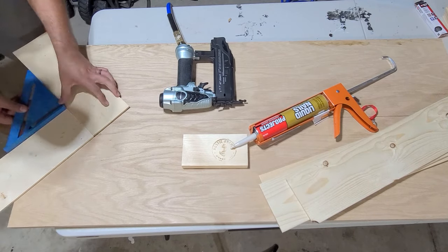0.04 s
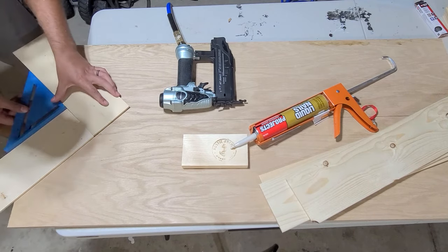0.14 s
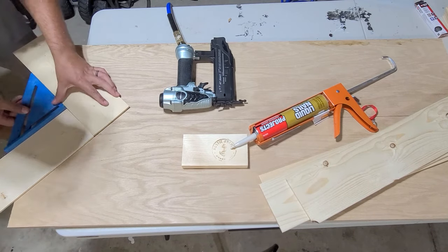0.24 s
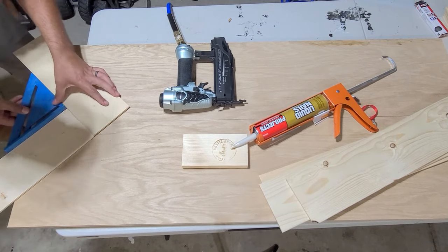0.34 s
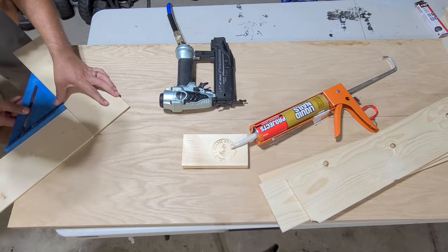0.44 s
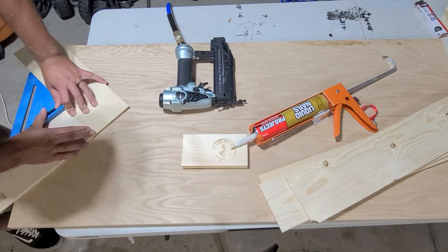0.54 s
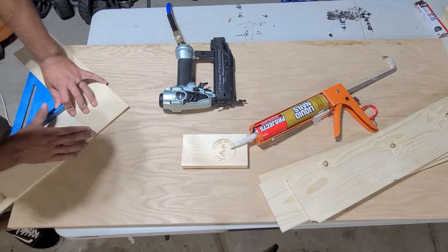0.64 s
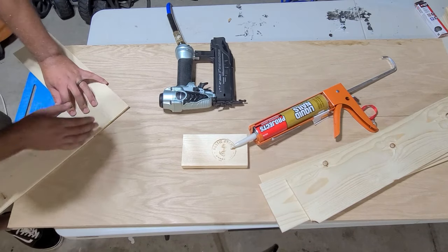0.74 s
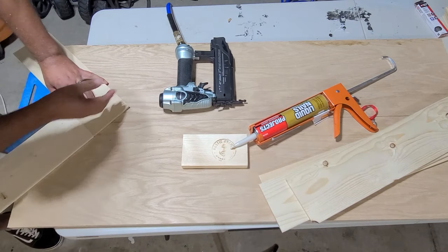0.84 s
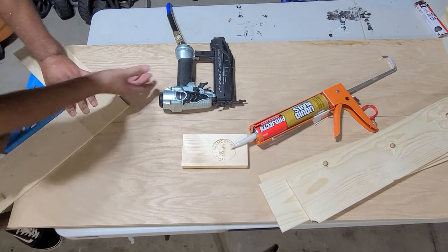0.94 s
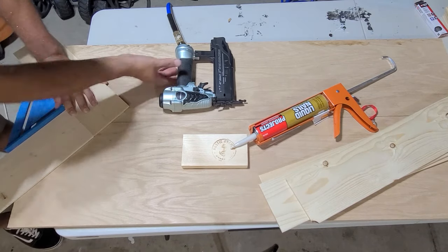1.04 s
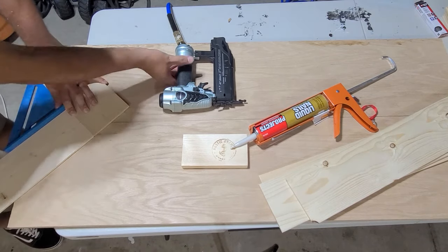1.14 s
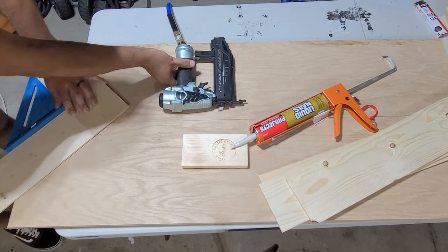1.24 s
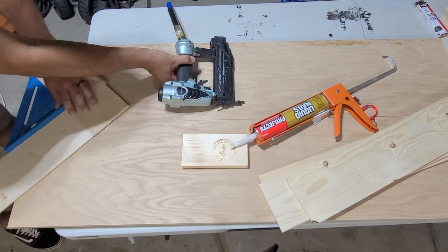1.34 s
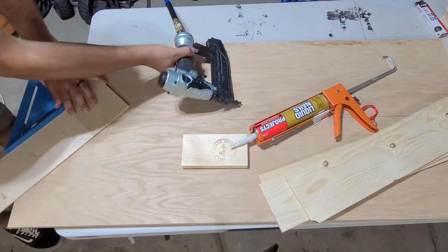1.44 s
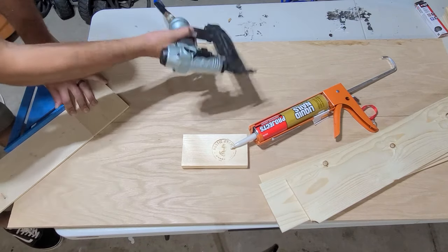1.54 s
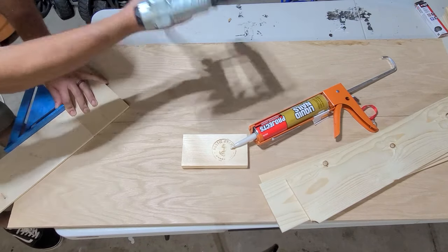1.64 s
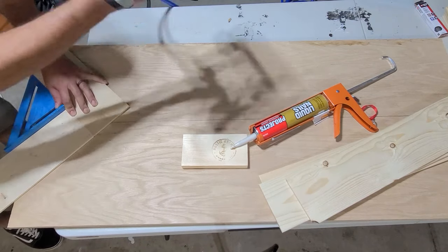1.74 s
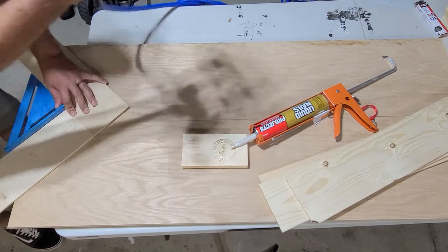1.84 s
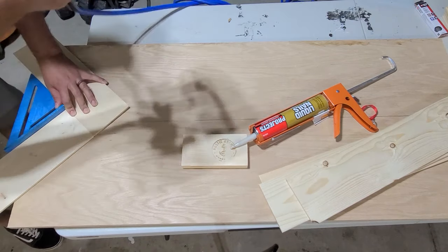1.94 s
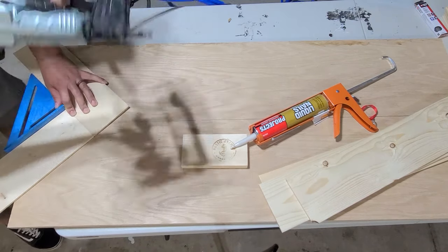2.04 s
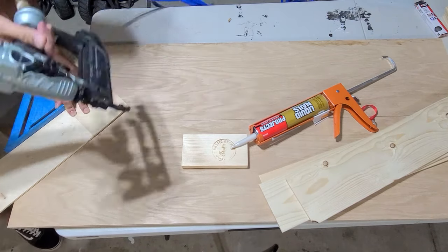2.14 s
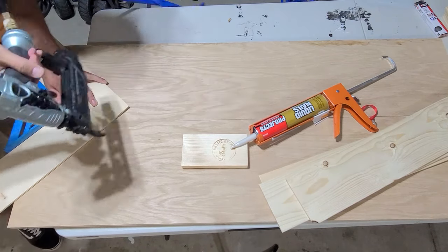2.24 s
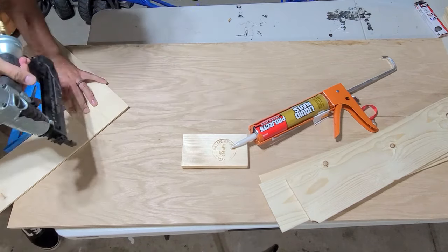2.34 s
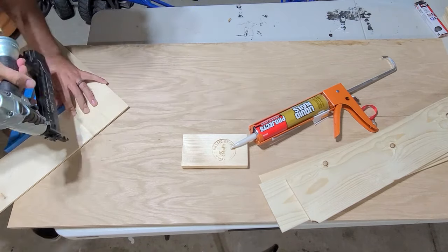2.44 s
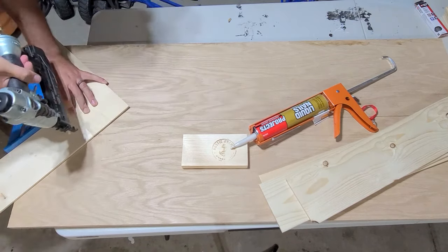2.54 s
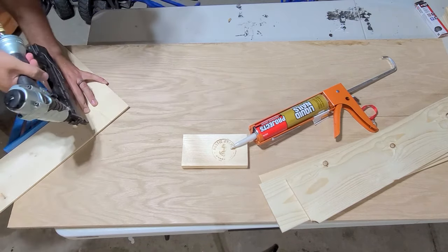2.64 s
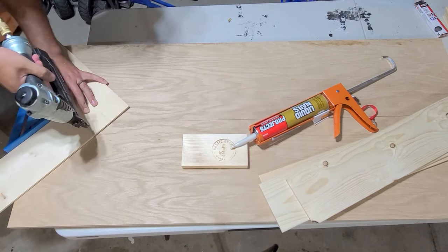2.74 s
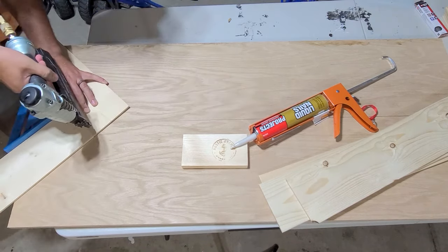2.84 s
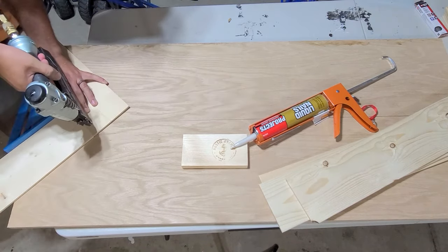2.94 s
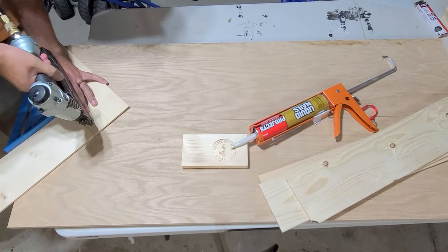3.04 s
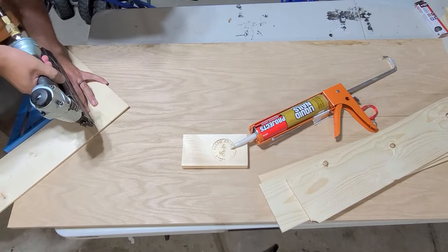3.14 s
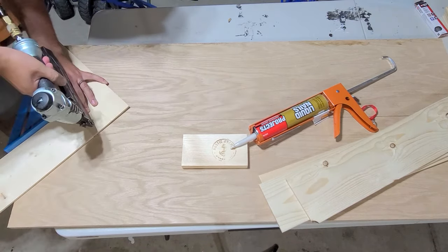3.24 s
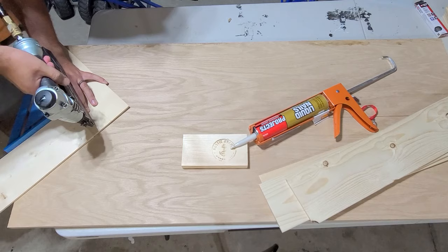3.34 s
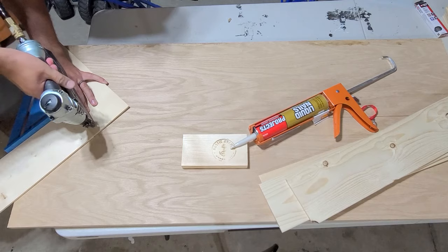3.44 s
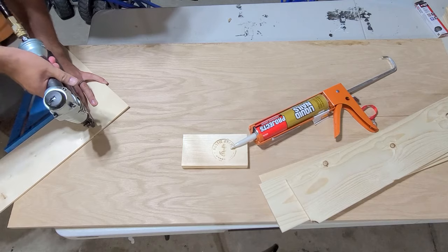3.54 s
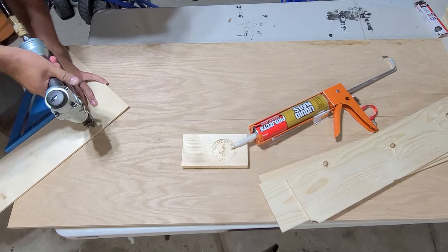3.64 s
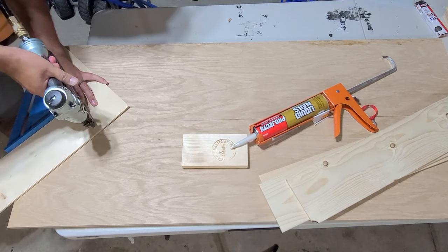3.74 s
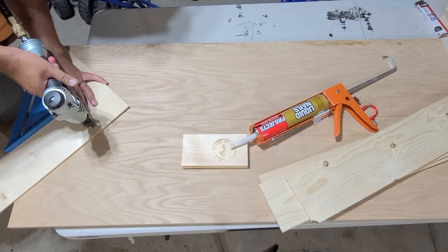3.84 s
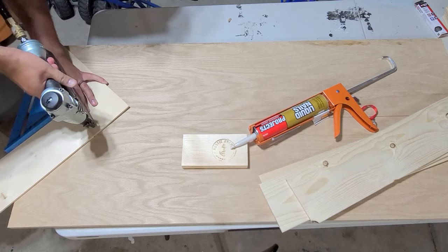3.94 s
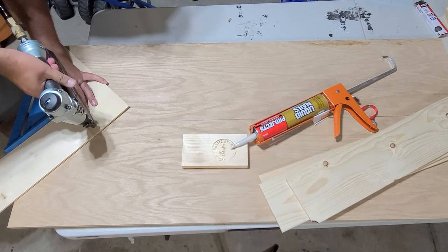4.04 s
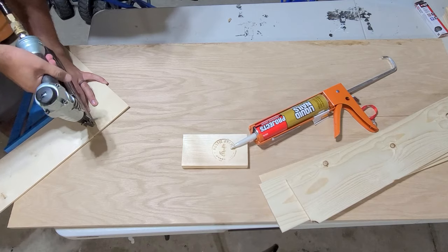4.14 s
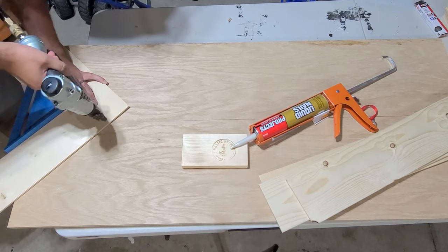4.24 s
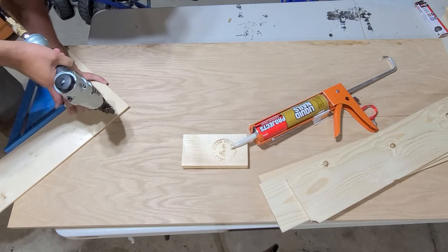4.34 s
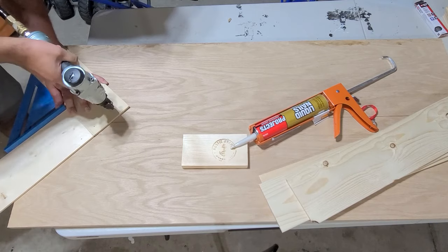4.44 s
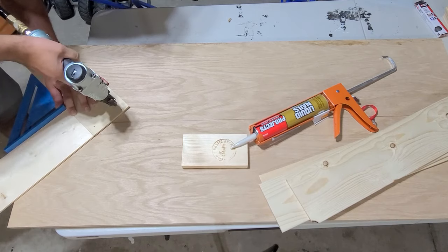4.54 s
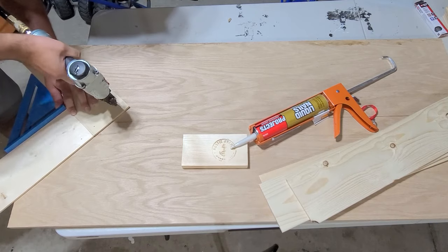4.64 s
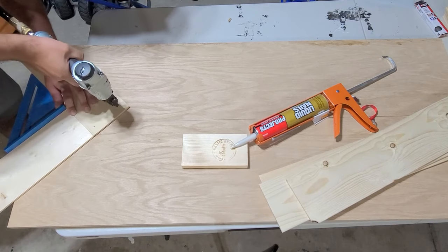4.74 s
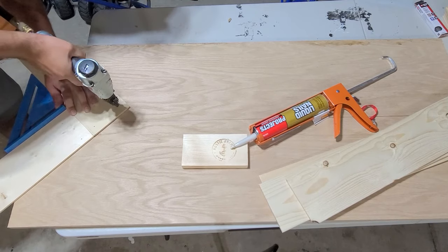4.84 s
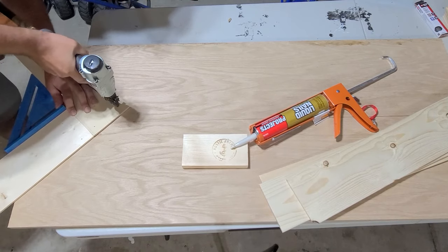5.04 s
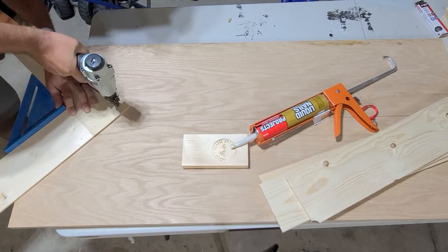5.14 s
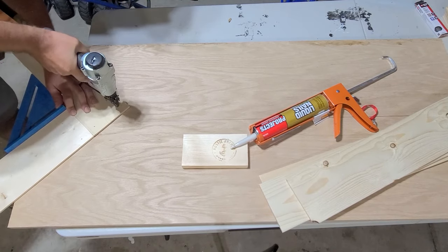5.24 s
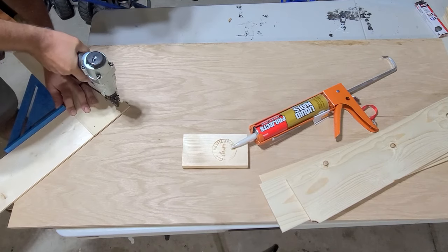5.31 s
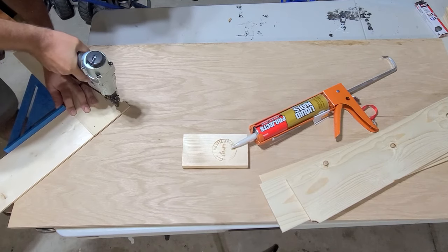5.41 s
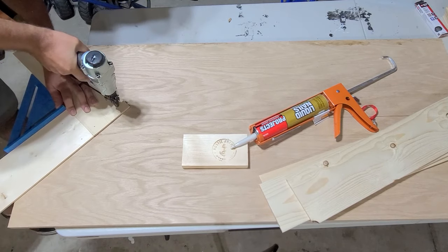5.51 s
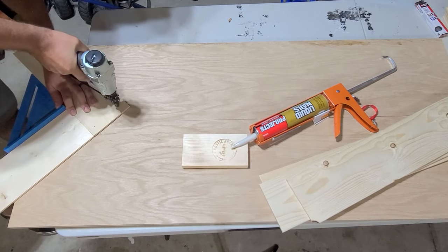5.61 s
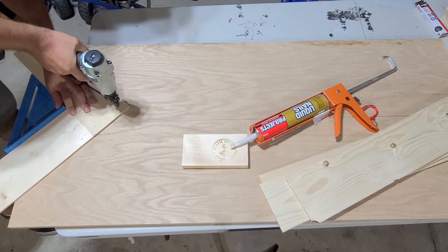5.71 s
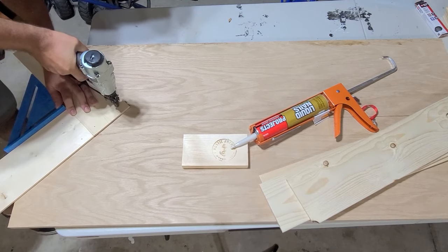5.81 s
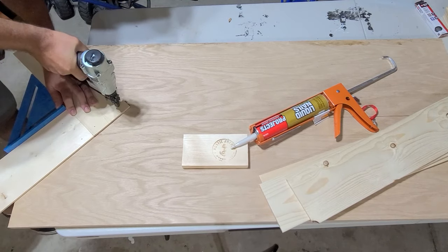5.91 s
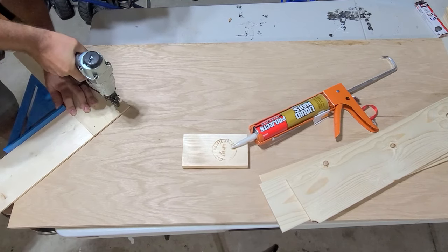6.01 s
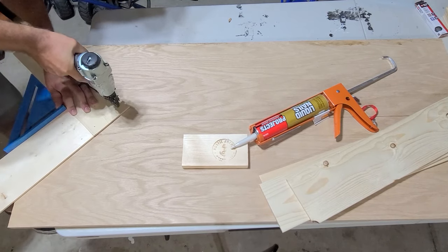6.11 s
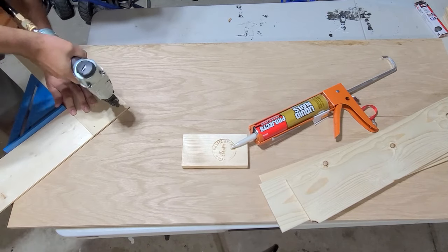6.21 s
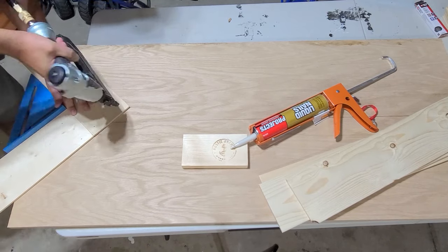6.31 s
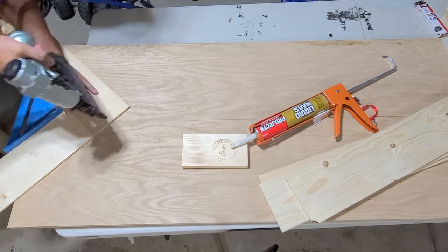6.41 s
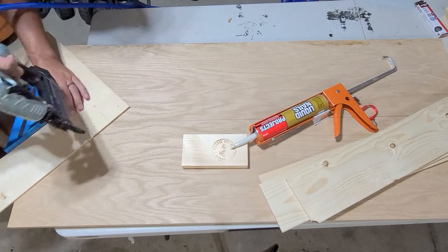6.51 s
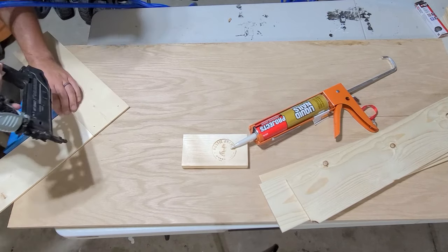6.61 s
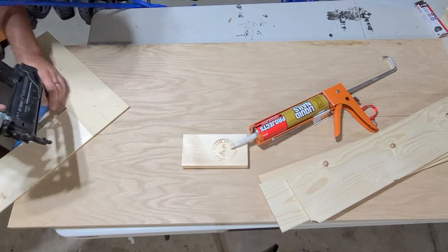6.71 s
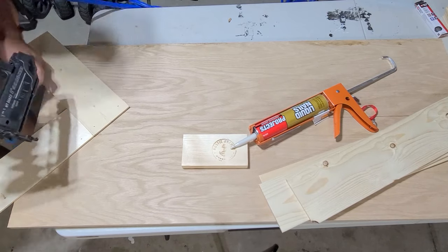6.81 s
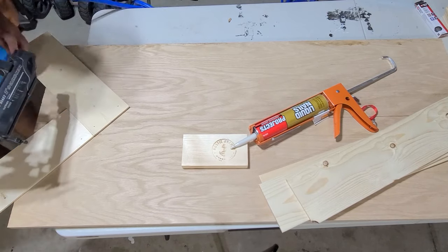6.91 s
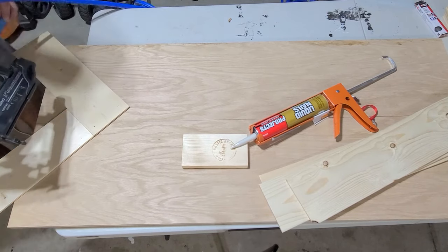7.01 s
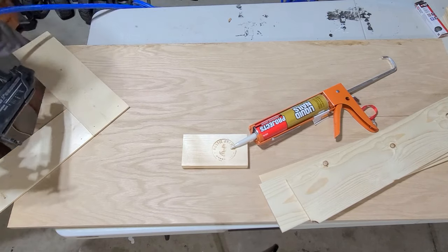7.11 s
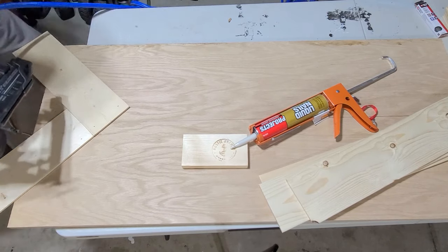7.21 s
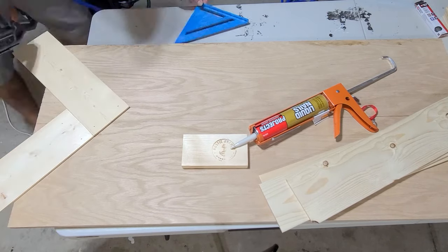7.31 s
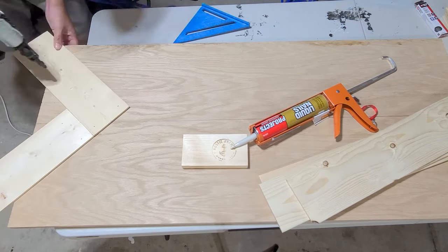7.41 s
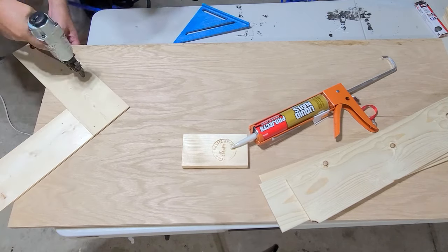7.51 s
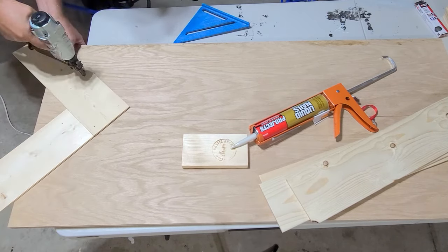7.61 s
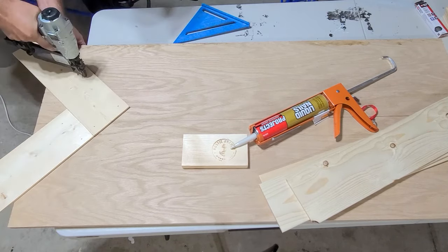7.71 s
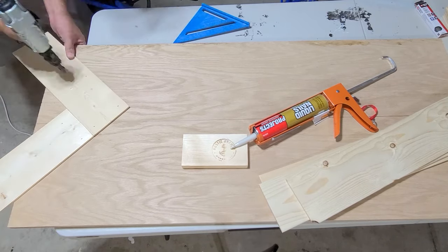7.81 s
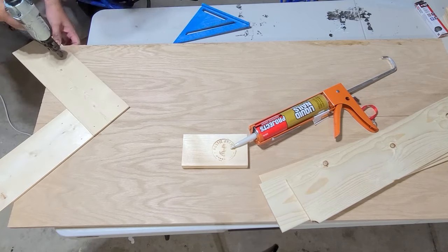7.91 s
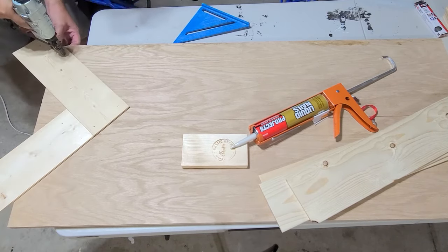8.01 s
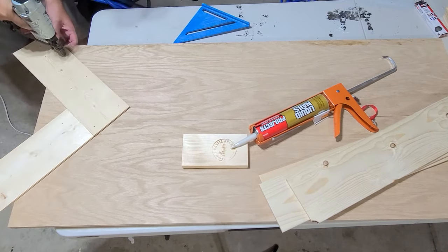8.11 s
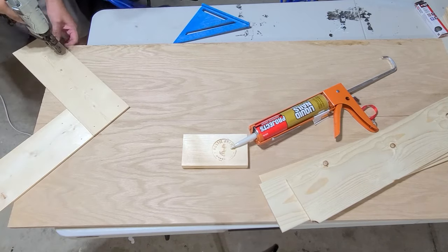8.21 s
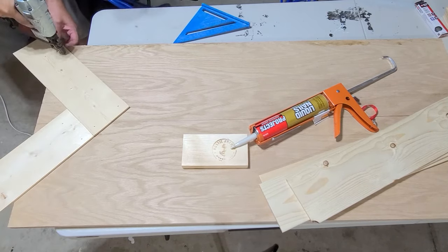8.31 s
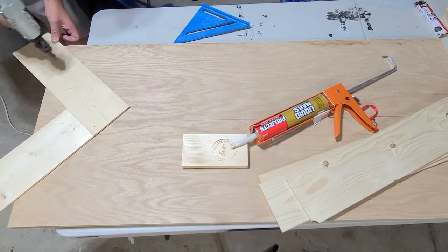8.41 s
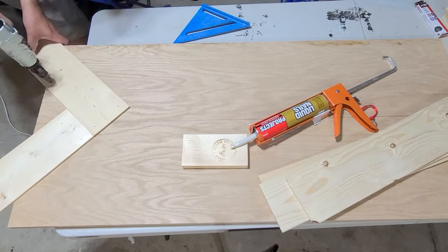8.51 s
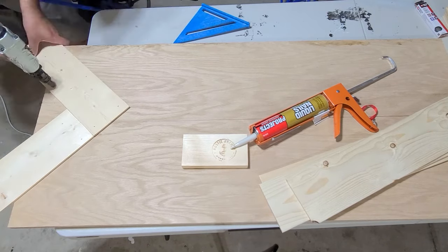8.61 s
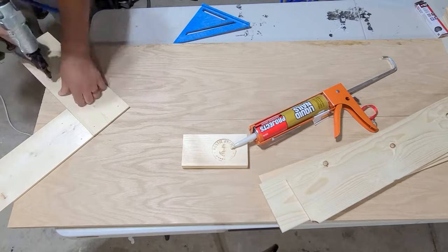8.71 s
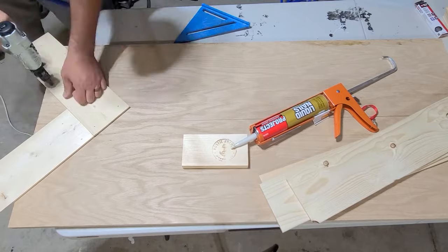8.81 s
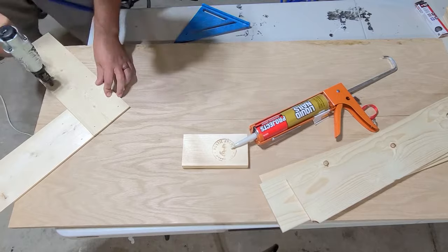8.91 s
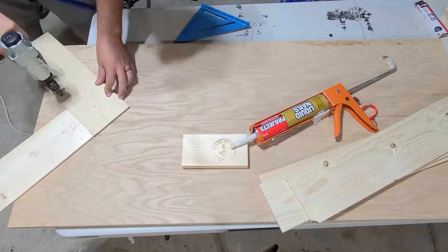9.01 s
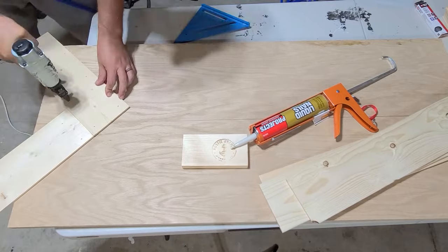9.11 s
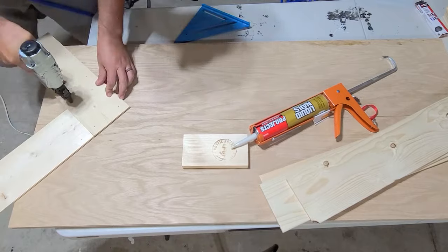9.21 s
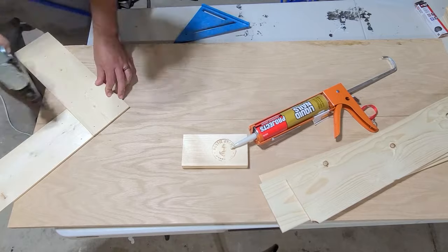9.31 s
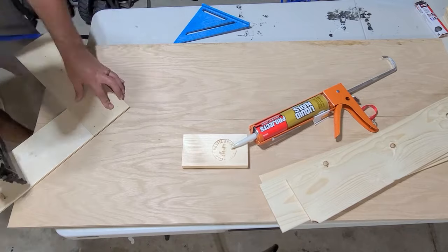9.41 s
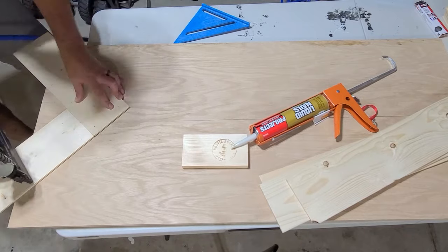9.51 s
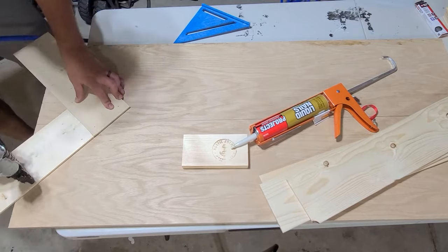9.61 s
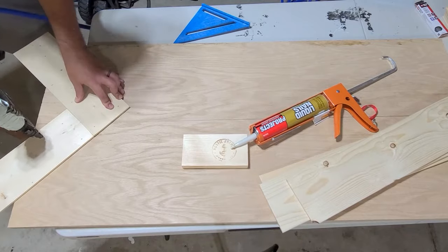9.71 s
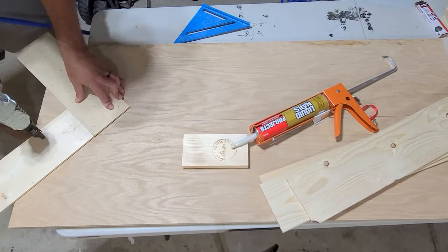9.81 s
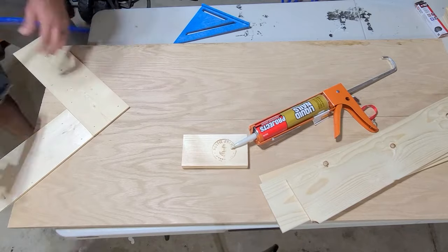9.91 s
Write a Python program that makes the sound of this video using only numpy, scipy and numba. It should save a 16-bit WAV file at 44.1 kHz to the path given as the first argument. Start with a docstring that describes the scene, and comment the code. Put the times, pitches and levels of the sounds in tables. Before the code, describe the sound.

In a hard, moderately echoing workshop, a square and planks clack on a wooden bench, a nailer is picked up with knocks and metal clicks, then fires two loud cracks about two seconds apart, each followed by an air spit and thud. A board scrapes and squeals; then the sound suddenly runs about six times faster, with six thin snapping shots amid tiny clatter. Small camera microphone, combed and automatically levelled.

```python
"""An air nailer drives eight brads into planks: each shot is a valve puff, a blow on wood and steel, and its rebound.
Letting go of the trigger ticks a latch, vents air as a noise burst and thuds the piston home.
Between shots boards and square knock (ringing modes), tool parts click, and boards scrape and squeal (stick-slip).
A small camera combs and levels the sound; after two nails it plays about six times faster, thin and bright."""
import sys
import numpy as np
from scipy import signal
from scipy.fft import rfft, irfft, next_fast_len
from scipy.io import wavfile
from scipy.ndimage import uniform_filter1d, minimum_filter1d
from numba import njit

SR = 44100
rng = np.random.default_rng(int(sys.argv[2]) if len(sys.argv) > 2 else 0)


def wav_out(sig):
    """Save sig, one row per channel (or a flat mono array), as 16-bit PCM at SR to the path in sys.argv[1]."""
    wavfile.write(sys.argv[1], SR, np.round(np.clip(np.atleast_2d(sig).T, -1, 1) * 32767).astype(np.int16))


N = 438794

# table times are as heard; SPEED applies from FAST_FROM_S on
FAST_FROM_S, SPEED = 7.245, 5.95
REAL_N = next_fast_len(int((FAST_FROM_S + (N / SR - FAST_FROM_S) * SPEED) * SR) + 1, True)
VENT_S = .022  # air rushes for this long, then the piston lands

# nails driven: (time [s], blow [dB], rebound re blow [dB], valve puff [dB])
SHOTS = [(3.9124, 13, -15, -8), (5.8780, 14.5, -19, -25), (7.7971, 8, 6, -21), (8.4126, 4.5, 6.5, -29),
         (8.9830, 10.5, 1, -24), (9.2964, 13.5, -5.5, -25.5), (9.646, 10.5, 3, -36), (9.8825, 7, 10.5, -35)]
# trigger let go: (time [s], vent [dB], piston thud [dB])
RELEASES = [(4.0337, 9, 2), (6.08, 10.5, 5.5), (7.8254, 5.5, 1.5), (8.437, -0.5, -1), (9.016, 2.5, 1.5),
            (9.329, 1, 2.5), (9.67, 2, -3), (9.9153, 4, 3.5)]
# spectrum of a hard contact: (frequency [Hz], level [dB])
STEEL_SPECTRUM = [(40, -64), (150, -21), (500, -4), (1400, 3), (2700, -2), (5000, -10), (8500, -16.5),
                  (12500, -12), (16000, -20.5)]


def undb(db):
    """Gain of a level in dB."""
    return np.exp(np.asarray(db, float) * (np.log(10) / 20))


def real(s):
    """Sample in real time of a heard moment."""
    s = np.asarray(s)
    return (s + (SPEED - 1) * np.maximum(s - FAST_FROM_S, 0)) * SR


def read(points, n):
    """(Hz, value) points on the bins of an n-sample transform."""
    hz, value = np.transpose(points)
    return np.interp(np.log(np.arange(n // 2 + 1) * SR / n + 1), np.log(hz), value)


def noise(points, n):
    """Noise of rms 1 with a spectrum of (Hz, dB) points."""
    size = next_fast_len(n, True)
    spectrum = rfft(rng.standard_normal(size)) * undb(read(points, size))
    x = irfft(spectrum, size)[:n]
    return x / np.std(x)


def wobble(n, hold, spread):
    """Random levels held for some samples and joined smoothly."""
    levels = spread * rng.standard_normal(n // hold + 1)
    return uniform_filter1d(np.repeat(levels, hold), hold)[:n]


def add(out, at, sound):
    """Mix a sound in at a sample."""
    part = out[int(at):int(at) + len(sound)]
    part += sound[:len(part)]


def burst(points, rise_s, hold_s, fall_s):
    """Coloured noise that rises, holds and dies away."""
    t = np.arange(6000) / SR
    rise = np.minimum(t / rise_s, 1)
    fall = np.exp(-np.maximum(t - hold_s, 0) / fall_s)
    return noise(points, len(t)) * rise * fall


def wood(contact_ms):
    """One blow on bench and planks, peak 1: modes vary in level and pitch; a longer push is duller."""
    # modes: (frequency [Hz], level [dB], t60 before limiting [s])
    wood_modes = [(205, -59, 0.013), (312, -20.5, 0.12), (443, -15, 0.024), (480, -5.5, 0.012),
                  (615, 13, 0.013), (728, 10, 0.071), (843, 13, 0.06), (950, 11.5, 0.057),
                  (1080, 10, 0.054), (1370, -4.5, 0.017), (1580, -9.5, 0.011), (1940, -13.5, .012),
                  (2400, -18, .01), (2780, -10.5, 0.009), (3500, -1, 0.0076), (4420, -20, .008)]
    t = np.arange(6000) / SR
    hz, db, t60 = np.transpose(wood_modes)[:, :, None]
    chance = rng.standard_normal((2, len(wood_modes), 1))
    db = db + 1.5 * chance[0]
    hz = hz * (1 + .03 * chance[1])
    t60 = np.clip(t60, .004, .03)
    ring = undb(db) * np.exp(t[:2500] * (2j * np.pi * hz - np.log(1000) / t60)).imag
    push = np.sin(np.pi * np.clip(t[:200] * 1000 / max(contact_ms, .05), 0, 1))
    y = np.convolve(np.pad(ring.sum(0), (0, len(t))), push)[:len(t)]
    return y / np.max(abs(y))


def crack(points, spread_s):
    """A hard contact, peak 1: minimum phase from (Hz, dB) points, each narrow band a random bit late."""
    n = 6000
    cepstrum = irfft(np.log(undb(read(points, n))), n)
    # fold to minimum phase
    cepstrum[1:n // 2] *= 2
    cepstrum[n // 2 + 1:] = 0
    band_late_s = spread_s * rng.exponential(size=n // 100 + 1)
    late_s = uniform_filter1d(np.repeat(band_late_s, 50), 50)[:n // 2 + 1]
    phase = 2 * np.pi * np.cumsum(late_s) * SR / n  # delay summed over the bins
    y = irfft(np.exp(rfft(cepstrum) - 1j * phase), n)
    y[n // 2:] = 0
    return y / np.max(abs(y))


def strike(modes):
    """One hard blow on (Hz, dB, t60) modes, peak 1; every mode gets a new share."""
    t = np.arange(3000) / SR
    hz, db, t60 = np.transpose(modes)[:, :, None]
    share_db = 3.0 * rng.standard_normal(db.shape)
    decay = 1000. ** (-t / np.clip(t60, .005, .024))
    ring = np.sum(undb(db + share_db) * np.sin(2 * np.pi * hz * t) * decay, axis=0)
    return ring / np.max(abs(ring))


def bench():
    """The bench trembles faintly; jolts, shots and releases shake it with low noise that dies away."""
    # hands and tool jolt it: (time [s], level [dB], decay constant in real time [s])
    thumps = [(0.09, -64, 0.046), (0.925, -37, .03), (1.02, -40, 0.029), (1.15, -48.5, 0.025),
              (1.33, -48, .06), (1.64, -58, 0.039), (2.02, -35.5, 0.07), (2.169, -37, 0.033),
              (2.29, -40, 0.054), (2.45, -45, 0.028), (2.51, -49, 0.037), (2.75, -57, 0.059),
              (3.13, -62, 0.025), (3.47, -49.5, 0.031), (6.47, -44, .03), (6.57, -42, 0.028),
              (6.759, -47.5, 0.037), (6.98, -32.5, 0.045), (7.08, -28, 0.046), (7.14, -39.5, .05),
              (7.252, -33.5, 0.054), (7.285, -38, 0.15), (7.34, -40, .06), (7.4, -51, 0.68),
              (7.598, -38, 0.042), (7.62, -43, .1), (7.695, -47, 0.071), (8.03, -52.5, .3),
              (8.245, -42, .06), (8.342, -42, 0.048), (8.7, -56, 0.16), (8.78, -54, 0.16),
              (8.87, -59, 0.15), (9.205, -43, 0.083), (9.55, -58, .3)]
    # (frequency [Hz], level [dB])
    bench_spectrum = [(15, -21.5), (35, -11.5), (65, 1.5), (120, -8.5), (200, -13), (400, -44)]
    rise_s, shot_db, shot_fall_s = 0.031, -43.5, .05
    size = undb(-65.5 + wobble(REAL_N, hold=4096, spread=6.5))  # tremble, dB
    shots = [(row[0], shot_db, shot_fall_s) for row in SHOTS + RELEASES]
    t = np.arange(SR) / SR
    rise = np.minimum(t / rise_s, 1)
    for s, db, fall_s in thumps + shots:
        fall = np.exp(-np.maximum(t - rise_s, 0) / fall_s)
        add(size, real(s), undb(db) * rise * fall)
    return size * noise(bench_spectrum, REAL_N)


def background():
    """Steady shop air as shaped noise, a faint electronic whine of wandering phase, and the shaken bench."""
    # (frequency [Hz], relative level per Hz [dB])
    shop_spectrum = [(18, -29.5), (35, -7.5), (80, -2), (300, -8), (900, -11.5), (2500, -18.5),
                     (7000, -23.5), (10000, -19), (13000, -14.5), (16500, -19)]
    shop_db, whine_hz, whine_db = -51.5, 12010, -68  # rms levels
    wander_rad = wobble(REAL_N, hold=512, spread=1.2)
    whine = np.sin(2 * np.pi * whine_hz * np.arange(REAL_N) / SR + wander_rad)
    shop = undb(shop_db) * noise(shop_spectrum, REAL_N)
    return shop + np.sqrt(2) * undb(whine_db) * whine + bench()


def taps():
    """The try square clacks on the board: short, bright modes."""
    # (time [s], peak [dB])
    square_taps = [(0.077, -14.5), (0.08, -18), (0.962, -16), (0.9656, -15)]
    # (frequency [Hz], level [dB], t60 before limiting [s])
    square_modes = [(422, -15, 0.033), (1285, 9, 0.012), (2600, 0.5, 0.015), (3500, -8, 0.01),
                    (4260, -12, .01), (6230, -19, .008)]
    out = np.zeros(REAL_N)
    for s, db in square_taps:
        add(out, real(s), undb(db) * strike(square_modes))
    return out


def knocks():
    """Boards knock on the bench and on each other: wood modes plus a bare contact tick."""
    # (time [s], wood level [dB], contact [ms], tick re wood [dB])
    board_knocks = [(0.077, -19, 0.34, -0.5), (0.182, -29.5, 0.96, -13), (0.218, -31, 1, -20),
                    (0.253, -26, 0.55, -15), (0.962, -13.5, 0.19, -11.5), (1.33, -10.5, 0.61, -24),
                    (1.339, -16.5, 1, -11.5), (1.368, -23, 0.6, -6), (1.413, -40, 0.36, 3),
                    (1.515, -26.5, 0.3, -9.5), (1.651, -37, 0.37, -12), (2.004, -21.5, 0.098, -11.5),
                    (2.049, -39, 0.33, -6), (2.076, -20, 0.33, -11.5), (2.12, -23.5, 0.25, -13),
                    (2.18, -40, 0.18, -5), (3.474, -31.5, 1, -7), (3.499, -29, 0.79, -22.5),
                    (4.549, -32, 0.72, -15), (4.68, -47.5, 0.78, -14.5), (4.783, -26, 0.3, -11),
                    (7.254, -33, 0.2, -7), (7.283, -31, 0.6, -0.5), (7.305, -26, 0.45, -7.5),
                    (7.331, -16.5, 0.92, 4.5), (7.35, -7.5, 0.51, 5), (7.596, -33, 0.64, -16),
                    (7.631, -30, 1, 5), (7.662, -31, 0.29, 1), (7.698, -28.5, 0.34, -3.5),
                    (8.251, -40, 0.22, 16), (8.302, -22, 0.26, -6), (8.339, -17.5, 0.64, -4.5),
                    (8.631, -22.5, 0.7, -3), (8.702, -28.5, 0.39, 8), (8.781, -27.5, 0.43, 8),
                    (8.809, -27.5, 0.4, -6), (8.819, -48, 0.5, 13), (9.127, -27, 0.82, 2.5),
                    (9.207, -24.5, 0.95, 4), (9.549, -29.5, 0.46, -2.5), (9.8, -25, 0.42, -8)]
    out = np.zeros(REAL_N)
    for s, db, contact_ms, tick_db in board_knocks:
        tick = undb(tick_db) * crack(STEEL_SPECTRUM, .003)
        add(out, real(s), undb(db) * (wood(contact_ms) + tick))
    return out


def drags():
    """Stick and slip of things dragged over wood: a low rasp and a hiss in uneven, swelling grains."""
    # (start [s], loud from [s], loud until [s], end [s], level [dB], treble re rasp [dB])
    # a loud-until time out of order leaves an abrupt edge
    wood_drags = [(0.447, 0.502, 0.5, 0.57, -51.5, 3.5), (0.856, 0.953, 1.44, 0.965, -48, -8),
                  (1.999, 2.07, 2.144, 2.3, -38, -20), (2.28, 2.308, 2.36, 2.45, -48.5, -3),
                  (2.42, 2.5, 2.586, 2.72, -63.5, 9), (3.464, 3.472, 3.43, 3.54, -43, -5),
                  (6.34, 6.466, 6.625, 6.69, -39.5, 13.5), (7.331, 7.366, 7.09, 7.43, -21, 4.5),
                  (7.45, 7.576, 7.7, 7.78, -53.5, 1.5), (8.166, 8.24, 9.4, 8.255, -55.5, 1),
                  (8.538, 8.569, 11.4, 8.62, -67.5, 10.5), (8.803, 8.85, 7.1, 8.97, -64, 3)]
    # low rasp: (frequency [Hz], level [dB])
    rasp_spectrum = [(120, -21), (400, -3), (900, -6), (2000, -15), (4000, -37.5)]
    # treble hiss: (frequency [Hz], level [dB])
    swish_spectrum = [(1200, 1), (2500, -8), (3700, -4.5), (4700, 2), (6000, -6), (8500, -2.5),
                      (11000, -5.5), (16000, -22.5)]
    edge_db = -26  # level at both ends re full
    out = np.zeros(REAL_N)
    for start, loud, still, end, db, treble_db in wood_drags:
        at = np.arange(int(real(start)), int(real(end)))
        corners = real([start, loud, still, end])
        swell_db = db + np.interp(at, corners, [edge_db, 0, 0, edge_db])
        grain_db = wobble(len(at), hold=256, spread=2.5)
        rasp = noise(rasp_spectrum, len(at))
        hiss = undb(treble_db) * noise(swish_spectrum, len(at))
        add(out, at[0], undb(swell_db + grain_db) * (rasp + hiss))
    return out


def clicks():
    """Metal and plastic tool parts click, each a noise band round its own pitch, and ring the housing."""
    # (time [s], level [dB], ring as heard [Hz], snap re ring [dB], hold in real time [ms])
    tool_clicks = [(1.3702, -23.5, 1820, -1.5, 2.1), (1.734, -42, 8900, -24, 1.8),
                   (1.858, -38, 8100, -55, 2.1), (2.3238, -19, 7850, -10, 1), (3.2571, -28, 9900, 3, 9.5),
                   (3.3732, -42, 2900, 4.5, 2.1), (3.4183, -36.5, 9330, -3.5, 1.9),
                   (4.446, -26, 1670, 14.5, 0.98), (4.6108, -37, 2850, 8, 4.2), (4.721, -44, 2717, 5, 2),
                   (4.784, -33, 2250, 4, 1.9), (4.818, -45, 3580, -4, 6.6), (5.593, -35.5, 9470, -5, 1.26),
                   (6.2923, -16, 8000, 5, 4.4), (7.5622, -17, 10500, -8, 4.1),
                   (7.9304, -26.5, 10100, 2.5, 7.5), (7.9444, -33.5, 14300, -13, 2.5),
                   (7.994, -35, 3500, -21, 2.3), (8.0032, -30, 9900, 11, 1.6), (8.045, -34, 3050, 2, 2.3),
                   (8.3247, -24.5, 3300, 7, 2.5), (8.689, -25, 13350, -7, 3.5),
                   (8.8635, -38.5, 4900, 9, 2.1), (9.088, -27, 14300, 3, 3.3), (9.152, -27, 2060, 1, 2.5),
                   (9.1635, -20, 1950, -0.5, 1.4), (9.176, -25, 9800, -15, 2.5),
                   (9.3903, -40.5, 3790, 4, 2.6), (9.405, -24, 1870, 0.5, 3.2),
                   (9.747, -35.5, 10400, -4, 3.2), (9.7685, -29, 9200, 10, 3.2)]
    # broad snap: (frequency [Hz], level [dB])
    snap_spectrum = [(800, -29.5), (2000, -3), (5000, -2.5), (10000, -2), (16000, -10.5)]
    # housing: (frequency [Hz], level [dB], t60 before limiting [s])
    housing_modes = [(1700, -1, 0.024), (2250, -9.5, 0.018), (2760, -2, .03), (3350, -3.5, .02),
                     (4440, -6, .018), (5360, -6, 0.023), (8600, -7.5, 0.014)]
    out = np.zeros(REAL_N)
    for s, db, ring_hz, snap_db, ms in tool_clicks:
        hz = ring_hz / (SPEED if s > FAST_FROM_S else 1)
        band = [(hz / 1.25, -30), (hz, 0), (hz * 1.25, -30)]
        ring = burst(band, .0004, ms / 1000, .003)
        snap = undb(snap_db - 3) * burst(snap_spectrum, 0.00013, ms / 1000, 0.0017)
        add(out, real(s), undb(db) * (ring + snap) / 2)
        add(out, real(s), undb(db + snap_db + 0.5) * strike(housing_modes))
    return out


def squeal():
    """A sliding board slips regularly: a row of overtones that the board's body picks from."""
    # (time [s], slips per second [Hz], level [dB])
    slips = [(6.64, 475, -69.5), (6.68, 487, -53), (6.75, 500, -55.5), (6.88, 504, -47), (6.925, 503, -68),
             (6.96, 502, -47.5), (7.03, 490, -49.5), (7.06, 462, -49.5), (7.141, 462, -55.5),
             (7.19, 440, -76.5)]
    # (frequency [Hz], level [dB])
    board_body = [(450, -30), (1000, -20), (1380, -10), (1500, 6), (1850, 0), (2500, -22), (3500, -18),
                  (4500, -30)]
    out = np.zeros(REAL_N)
    s, rate_hz, db = np.transpose(slips)
    at = np.arange(int(real(s[0])), int(real(s[-1])))
    waver = 1 + 0.002 * noise([(20, -24), (80, -6.5), (300, -72.5)], len(at))
    overtone = np.arange(1, 10)[:, None]
    hz = overtone * np.interp(at, real(s), rate_hz) * waver
    flutter_db = wobble(len(at), hold=400, spread=3)
    body_hz, body_level_db = np.transpose(board_body)
    body_db = np.interp(np.log(hz), np.log(body_hz), body_level_db)
    gain = undb(np.interp(at, real(s), db) + body_db + flutter_db)
    tones = gain * np.sin(2 * np.pi * np.cumsum(hz, axis=1) / SR)
    add(out, at[0], np.sum(tones, axis=0))
    return out


def hoots():
    """Short soft hoots: single tones that swell and fade."""
    # as heard: (time [s], length [s], frequency [Hz], level [dB])
    soft_hoots = [(1.621, 0.087, 343, -49), (1.73, 0.12, 444, -48.5), (9.125, .014, 2100, -35),
                  (9.16, .012, 2150, -46)]
    out = np.zeros(REAL_N)
    for s, length_s, hz, db in soft_hoots:
        n = int(real(s + length_s) - real(s))
        tone = np.sin(2 * np.pi * hz * length_s * np.arange(n) / n)
        add(out, real(s), undb(db) * np.hanning(n) * tone)
    return out


def nailer():
    """Valve puff, blow, rebound and blow-by air; on release a latch tick and the piston's thud."""
    # escaping air: (frequency [Hz], level [dB])
    air_spectrum = [(300, -36.5), (3000, -22.5), (6000, -20.5), (8000, 4), (10000, 2.5), (12300, 0.5),
                    (14000, -7.5), (16000, -19)]
    valve_lead_s, rebound_s, blowby_s, latch_lead_s = .009, .0057, .0093, .003
    out = np.zeros(REAL_N)
    for s, blow_db, rebound_db, valve_db in SHOTS:
        at, gain = real(s), undb(blow_db)
        puff = burst(air_spectrum, 0.0057, 0.0021, .0015)
        blow = undb(-2.5) * wood(0.36) + undb(6) * crack(STEEL_SPECTRUM, .0016)
        rebound = undb(-12.0) * wood(0.056) + undb(6.5) * crack(STEEL_SPECTRUM, .0012)
        blowby = burst(air_spectrum, 0.00039, 0.005, 0.0091)
        add(out, at - valve_lead_s * SR, undb(valve_db) * puff)
        add(out, at, gain * blow)
        add(out, at + rebound_s * SR, gain * undb(rebound_db) * rebound)
        add(out, at + blowby_s * SR, gain * undb(-13.0) * blowby)
    for s, _, thud_db in RELEASES:
        at = real(s)
        thud = wood(0.52) + undb(0.5) * crack(STEEL_SPECTRUM, .002)
        add(out, at - latch_lead_s * SR, undb(-3) * crack(STEEL_SPECTRUM, .0015))
        add(out, at + VENT_S * SR, undb(thud_db) * thud)
    return out


def vent():
    """Air rushes out of the cap of the tool when the trigger is let go: a burst of bright noise."""
    # (frequency [Hz], level [dB])
    vent_spectrum = [(300, -36), (3000, -18), (6500, -8), (7600, -1.5), (9500, 1), (12000, 1), (14500, -4),
                     (16500, -12)]
    out = np.zeros(REAL_N)
    for s, vent_db, _ in RELEASES:
        add(out, real(s), undb(vent_db) * burst(vent_spectrum, 0.00067, VENT_S, 0.00095))
    return out


def room():
    """A dense noise tail that builds up and dies band by band."""
    # (frequency [Hz], t60 [s])
    room_t60 = [(60, .8), (150, .52), (400, .51), (1000, .54), (2500, .6), (5000, .56), (8500, .52),
                (12000, .43), (15500, .3)]
    room_db, rise_s = 2, 0.004
    t = np.arange(SR) / SR
    tail = 0
    for k, (_, t60) in enumerate(room_t60):
        share = read([(hz, float(j == k)) for j, (hz, _) in enumerate(room_t60)], SR)
        band = irfft(rfft(rng.standard_normal(SR)) * np.sqrt(share), SR)
        tail = tail + band * 1000. ** (-t / t60)
    tail = tail * (1 - np.exp(-(t / rise_s) ** 2))
    return undb(room_db) * tail / np.sqrt(np.sum(tail ** 2))


@njit
def duck(want_db, fall, hold, rise_db):
    """Gain in dB that falls towards what is wanted, waits, then climbs back at a steady rate."""
    out, g, wait = np.empty(len(want_db)), 0., 0.
    for i in range(len(want_db)):
        if want_db[i] < g:
            g += fall * (want_db[i] - g)
            wait = hold
        elif wait > 0:
            wait -= 1
        else:
            g = min(g + rise_db, want_db[i])
        out[i] = g
    return out


def ports(air):
    """A second microphone port is subtracted late, combing the spectrum."""
    # share of the late sound: (frequency [Hz], share [0-1])
    port_share = [(300, 0), (1000, .75), (2000, .85), (7000, .9), (10000, .7), (11500, 0)]
    lag_ms, echo = .986, 0.52
    hz = np.arange(REAL_N // 2 + 1) * SR / REAL_N
    late = read(port_share, REAL_N) * np.exp(-2j * np.pi * hz * lag_ms / 1000)
    # part of the late sound goes round again, which narrows the notches
    return irfft(rfft(air) * (1 - late) / (1 - echo * late), REAL_N)


def camera(air, knee_db=-24, slope=0.47, fall_s=0.036, hold_s=1.0, rise_db_s=11,
           top_db=-1.0, limit_db_s=900, low_hz=34):
    """Combing ports, slow gain control that ducks after loud sounds, a quick peak limiter, a deep-bass cut."""
    x = ports(air)
    level_db = 10 * np.log10(uniform_filter1d(x ** 2, 256) + 1e-12)
    want_db = np.minimum(slope * (knee_db - level_db), 0)
    x = x * undb(duck(want_db, 1 / (fall_s * SR), hold_s * SR, rise_db_s / SR))
    spare_db = np.minimum(top_db - 20 * np.log10(abs(x) + 1e-9), 0)
    limit_db = duck(minimum_filter1d(spare_db, 64), 0.95, 0., limit_db_s / SR)
    x = x * undb(uniform_filter1d(limit_db, 32))
    return signal.sosfilt(signal.butter(8, low_hz, "high", fs=SR, output="sos"), x)


def scene():
    """The shop in real time through the camera; the last part is then played fast."""
    # blows and knocks carry no deep bass
    thin = signal.butter(2, 140, "high", fs=SR, output="sos")
    shots, boards = signal.sosfilt(thin, [nailer(), knocks()])
    small = clicks() + taps() + drags() + squeal() + hoots()
    jet = vent()
    # the small sounds and the air jet aim at the camera and stir the room less
    sent = shots + undb(-2.5) * boards + undb(-15) * small + undb(-5.5) * jet
    reverb = signal.oaconvolve(sent, room())[:REAL_N]
    taken = camera(shots + boards + small + jet + reverb + background())
    cut = int(FAST_FROM_S * SR)
    # low-pass against aliasing before the speed-up
    smooth = signal.sosfilt(signal.butter(8, SR / SPEED / 2, fs=SR, output="sos"), taken)
    fast = np.interp(real(np.arange(cut, N) / SR), np.arange(REAL_N), smooth)
    return np.r_[taken[:cut], fast][None]


def record(dry):
    """The top is cut steeply at 15750 Hz."""
    return signal.sosfilt(signal.ellip(10, .2, 70, 15750, fs=SR, output="sos"), dry)


dry = scene()
out = record(dry)
wav_out(out)
```